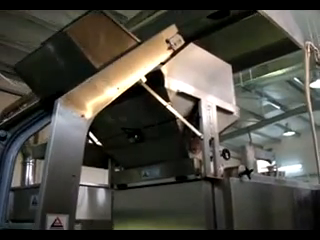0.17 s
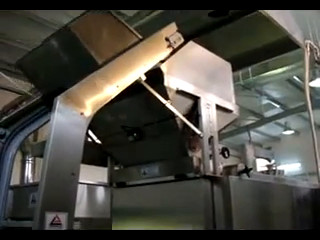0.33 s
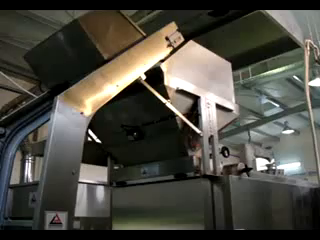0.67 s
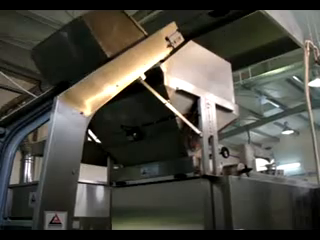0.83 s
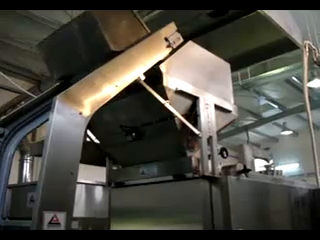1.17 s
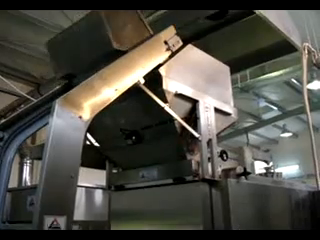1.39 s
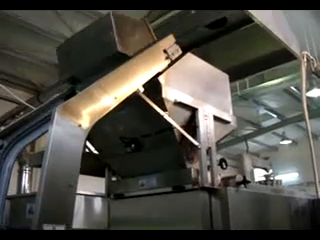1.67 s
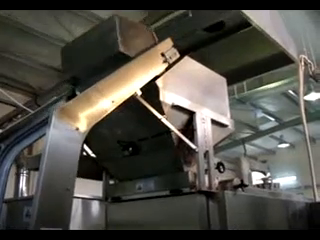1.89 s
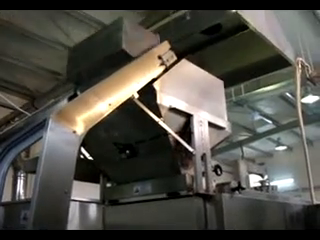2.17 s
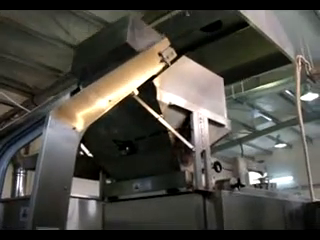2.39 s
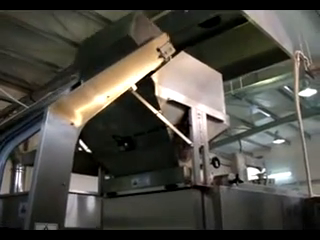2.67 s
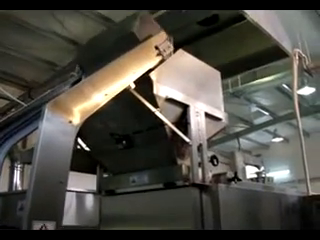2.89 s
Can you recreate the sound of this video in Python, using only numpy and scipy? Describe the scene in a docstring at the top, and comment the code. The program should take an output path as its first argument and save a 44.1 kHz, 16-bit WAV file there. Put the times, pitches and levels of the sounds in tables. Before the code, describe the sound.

Dense, loud machine noise from a bucket elevator fills a factory hall: steady grinding rattle over low rumble and motor hum, bright grainy hiss swelling early, a few dull clunks near start and end; single microphone, centred.

```python
"""A bucket elevator runs among other machines in a factory hall, heard by one microphone.
Its chain and buckets are patchy noise mixed with a dense rattle of tiny contacts that rings the steel casing.
Motors hum and gears whine as unsteady sine tones, over a drone, rumble and roar made of filtered noise.
A few hollow clunks are short bursts of resonant noise. A bright, grainy hiss swells early and ebbs near the end."""
import sys
import numpy as np
from scipy import signal
from scipy.fft import rfft, irfft, next_fast_len
from scipy.io import wavfile
from scipy.ndimage import uniform_filter1d, map_coordinates

SR = 44100
rng = np.random.default_rng(int(sys.argv[2]) if len(sys.argv) > 2 else 0)


def bounce(signal):
    """Save signal as a 16-bit WAV file at the path given by the first command-line argument."""
    frames = np.transpose(np.atleast_2d(signal))
    limited = np.clip(frames, -1, 1)
    pcm = np.round(limited * 32767).astype(np.int16)
    wavfile.write(sys.argv[1], SR, pcm)


N = 133623  # samples, about 3 seconds

# Pitch of the lower hum, which sags: (time [s], pitch [Hz])
LOW_HUM_PITCH = [(1.1, 250.3), (1.25, 242.3)]
# Loudness of the two motor hums: (time [s], level [dB])
HUM_LEVEL = [(0, -34), (0.15, -28.5), (0.27, -30), (0.35, -33.5), (0.55, -32), (0.86, -28), (1.0, -30),
             (1.45, -32), (1.66, -28.5), (1.87, -29.5), (1.96, -31.5), (2.05, -29.5), (2.26, -26),
             (2.38, -32), (2.65, -32.5), (2.8, -37), (3.03, -34)]
LOW_HUM_LEVEL = [(.6, -52), (1, -34.5), (1.25, -35), (1.45, -33.5), (1.68, -31), (1.95, -52)]
# Steady gear whines: (pitch [Hz], level [dB])
GEAR_WHINES = [(619, -42.5), (1049, -41.5), (1394, -42.5), (2550, -45), (2606, -40), (4226, -46),
               (8047, -54)]
# Loudness of each noise layer, before any fixed gain below is added: (time [s], level [dB])
DRONE_LEVEL = [(0, -60), (0.2, -51), (0.5, -65), (0.75, -61), (0.9, -62), (1.35, -58), (1.65, -56),
               (1.8, -50), (2.12, -48), (2.24, -61), (2.5, -58), (2.82, -69), (3.03, -60)]
RUMBLE_LEVEL = [(0, -36), (0.22, -33), (0.45, -38), (0.72, -33.5), (0.95, -39), (1.15, -34.5),
                (1.42, -38.5), (1.6, -33.5), (1.85, -32), (2.1, -34), (2.4, -36.5), (2.8, -37.5),
                (3.03, -37)]
ROAR_LEVEL = [(0, -24), (0.27, -23), (0.42, -26), (0.52, -27), (0.66, -23), (0.87, -23.5), (0.97, -25),
              (1.2, -25.5), (1.45, -25), (1.72, -23), (1.97, -24.5), (2.2, -24), (2.5, -25.5), (2.72, -24),
              (3.03, -23)]
UPPER_ROAR_LEVEL = [(0, -22), (0.17, -22), (0.33, -22.5), (0.42, -26), (0.5, -22.3), (0.65, -23.5),
                    (0.73, -26.5), (0.87, -21.5), (0.97, -26), (1.08, -23.5), (1.22, -23), (1.42, -24.6),
                    (1.7, -23.5), (1.85, -25.5), (2.05, -23.5), (2.25, -20.5), (2.42, -21), (2.68, -23),
                    (2.87, -20), (3.03, -24.5)]
DIN_LEVEL = [(0, -18), (0.15, -18), (0.45, -19.5), (0.75, -17.5), (0.93, -18.0), (1.02, -17.5),
             (1.3, -17.5), (1.48, -19.5), (1.7, -17.5), (1.95, -17.5), (2.15, -16.5), (2.45, -16.5),
             (2.8, -17), (3.03, -18.0)]
HISS_LEVEL = [(0, -28), (0.17, -25), (0.3, -22.5), (0.62, -22.5), (0.74, -21.5), (0.85, -22.5),
              (1.1, -23.5), (1.5, -23.5), (1.9, -23.5), (2.4, -24.5), (2.7, -24), (2.9, -27), (3.03, -25)]
# Tone colour of each noise layer, relative only: (frequency [Hz], level [dB])
DRONE_SPECTRUM = [(20, -10), (40, -6), (60, 2), (80, 0.5), (160, -20.5), (500, -61.5)]
RUMBLE_SPECTRUM = [(20, -57), (55, -42), (75, -22), (92, -9), (112, 0), (160, 0.3), (190, -2.5), (230, 0),
                   (300, -4), (500, -13), (1200, -55.5)]
ROAR_SPECTRUM = [(100, -41), (220, -10.5), (305, -2.5), (370, -4), (430, -1.5), (490, 0), (630, 0),
                 (740, -3), (900, -14.5), (2200, -45)]
UPPER_ROAR_SPECTRUM = [(400, -38), (620, -10.5), (760, 0), (850, 0.5), (1120, 0.1), (1400, -5), (2200, -16.5),
                       (6000, -56)]
DIN_SPECTRUM = [(400, -36.5), (1000, -6.5), (1450, -0.5), (1850, -0.5), (2100, 0.86), (3000, 0.5),
                (3750, -1), (4400, -4.5), (5300, -7.5), (7000, -19), (10000, -44.5)]
HISS_SPECTRUM = [(2000, -41), (4200, -7), (5400, -2.5), (6500, -0.5), (7300, -3), (8200, -7), (9000, -13),
                 (9600, -21), (10000, -35.5)]
# Broad resonances of the steel casing, relative levels: (frequency [Hz], width [Hz], level [dB])
CASING_RESONANCES = [(450, 27, -7.5), (610, 75, 9.5), (820, 44, -3), (866, 58, 6.5), (990, 26, -5),
                     (1052, 41, 4), (1200, 50, 1), (2300, 70, -15)]
# Hollow clunks, each timed at its loudest moment: (time [s], pitch [Hz], level [dB])
CLUNKS = [(0.191, 590, -22.5), (0.26, 606, -27), (0.74, 617, -24.5), (1.054, 626, -23.5), (2.51, 524, -25),
          (2.596, 694, -22.5)]

HUM_HZ = 277.4
TONE_KNOTS_PER_S, TONE_DRIFT_HZ = 3.47, 0.39  # speed and typical size of the pitch drift
# Fixed gains added to the levels above; the casing gain is relative to the din level
RUMBLE_DB, UPPER_ROAR_DB, DIN_DB, CASING_DB, HISS_DB = 1.3, 0.5, -0.02, -16, 1.2
DRONE_LUMPS_DB, DRONE_KNOTS_PER_S = 4.5, 15
RATTLES_PER_S, RATTLE_SPREAD_DB = 900, 3.5  # average number of contacts, and how unequal they are
RATTLE_DB = -4  # rattle against the patchy noise of the elevator
HALL_T60_S, HALL_DB = 1, -2  # time for the tail to fall 60 dB, and its level against the bare rattle
HISS_GRAIN_DB = -5.5  # rattle against the patchy noise of the hiss
HISS_FLUTTER_DB, HISS_KNOTS_PER_S = 0.37, 35
CLUNK_ATTACK_S, CLUNK_T60_S = 0.028, 0.27
CLUNK_WIDTH_HZ = 200  # width of one resonance; two in a row ring narrower
TOP_HZ = 9900


def amp(db):
    """Turn decibels into a plain gain."""
    return 10 ** (np.asarray(db) / 20)


def unit(x):
    """Scale a sound to an average (rms) strength of 1."""
    return x / np.sqrt(np.mean(x ** 2) + 1e-20)


def curve(rows):
    """Join (time, value) points with straight lines, one value per sample."""
    times, values = np.transpose(rows)
    return np.interp(np.arange(N) / SR, times, values)


def level(rows):
    """Turn (time, dB) points into one gain per sample."""
    return amp(curve(rows))


def wobble(knots_per_s):
    """Draw a smooth random curve through knots_per_s random points a second."""
    knots = rng.standard_normal(400)
    return map_coordinates(knots, [np.arange(N) * knots_per_s / SR + 2], mode="mirror")


def filtered(x, response):
    """Multiply each frequency in a sound by the response at that frequency."""
    size = next_fast_len(N + SR // 2)  # spare room keeps the end from wrapping to the start
    hz = np.fft.rfftfreq(size, 1 / SR)
    return irfft(rfft(x, size) * response(hz), size)[:N]


def coloured(x, spectrum):
    """Shape a sound by (frequency, dB) points on a log axis, then scale it to rms 1."""
    points_hz, db = np.transpose(spectrum)

    def response(hz):
        return amp(np.interp(np.log(hz + 1), np.log(points_hz + 1), db))

    return unit(filtered(x, response))


def resonance(hz, centre, width):
    """Response of one springy resonance: strongest at its centre, weaker to both sides."""
    return 1j * hz * width / (centre * centre - hz * hz + 1j * hz * width)


def rush(patchy_db):
    """Noise with patches of random loudness in time and frequency, at rms 1."""
    noise = signal.stft(rng.standard_normal(N), nperseg=512)[2]
    patches = uniform_filter1d(rng.standard_normal(noise.shape), size=6, axis=0)  # smooth over frequency
    patches = uniform_filter1d(patches, size=16, axis=1)  # smooth over time
    patchy_noise = noise * amp(patchy_db * unit(patches))
    return unit(signal.istft(patchy_noise, nperseg=512)[1][:N])


def tone(hz, wander_db):
    """A sine of rms 1, slightly unsteady in level and pitch."""
    pitch = hz + TONE_DRIFT_HZ * wobble(TONE_KNOTS_PER_S)
    phase = 2 * np.pi * (np.cumsum(pitch) / SR + rng.random())
    return unit(amp(wander_db * wobble(TONE_KNOTS_PER_S)) * np.sin(phase))


def drives():
    """One motor hums throughout, a lower hum swells and sags in pitch, and gears whine faintly."""
    hum = level(HUM_LEVEL) * tone(HUM_HZ, wander_db=-0.7)
    low_hum = level(LOW_HUM_LEVEL) * tone(curve(LOW_HUM_PITCH), wander_db=1.5)
    whines = sum(amp(db) * tone(hz, wander_db=-1.5) for hz, db in GEAR_WHINES)
    return hum + low_hum + whines


def hall():
    """The machines' lumpy low drone, rumble and roar, each made of filtered noise."""
    lumps = amp(DRONE_LUMPS_DB * wobble(DRONE_KNOTS_PER_S))
    low_noise = coloured(rng.standard_normal(N), DRONE_SPECTRUM)
    drone = level(DRONE_LEVEL) * unit(lumps * low_noise)
    rumble = amp(RUMBLE_DB) * level(RUMBLE_LEVEL) * coloured(rush(patchy_db=0.26), RUMBLE_SPECTRUM)
    roar = level(ROAR_LEVEL) * coloured(rush(patchy_db=0.5), ROAR_SPECTRUM)
    return drone + rumble + roar


def rattle():
    """Countless small steel contacts at random moments, each followed by the hall's fading tail."""
    count = N + SR  # one extra second first, so tails already sound at the start
    happens = rng.random(count) < RATTLES_PER_S / SR
    ticks = happens * np.sign(rng.standard_normal(count))
    ticks = ticks * amp(RATTLE_SPREAD_DB * rng.standard_normal(count))
    tail = rng.standard_normal(SR) * amp(-60 * np.arange(SR) / SR / HALL_T60_S)
    echoes = signal.fftconvolve(ticks, tail)[SR:count]
    return unit(unit(ticks[SR:]) + amp(HALL_DB) * unit(echoes))


def casing_response(hz):
    """The steel casing's resonances, added together."""
    return sum(amp(db) * resonance(hz, centre, width) for centre, width, db in CASING_RESONANCES)


def elevator():
    """The roar's upper band, while the chain and buckets scrape and rattle and the casing rings with them."""
    upper_roar = amp(UPPER_ROAR_DB) * level(UPPER_ROAR_LEVEL) * coloured(rush(patchy_db=0.7), UPPER_ROAR_SPECTRUM)
    contacts = unit(rush(patchy_db=0.6) + amp(RATTLE_DB) * rattle())
    din = amp(DIN_DB) * coloured(contacts, DIN_SPECTRUM)
    ring = amp(CASING_DB) * unit(filtered(contacts, casing_response))
    return upper_roar + level(DIN_LEVEL) * (din + ring)


def hiss():
    """A bright hiss, as of goods sliding over steel: noise and rattle with a slight flutter."""
    grains = unit(rush(patchy_db=1.53) + amp(HISS_GRAIN_DB) * rattle())
    flutter = amp(HISS_FLUTTER_DB * wobble(HISS_KNOTS_PER_S))
    return amp(HISS_DB) * level(HISS_LEVEL) * flutter * coloured(grains, HISS_SPECTRUM)


def clunks():
    """Short hollow surges of resonant noise, as of buckets jolting against the casing."""
    out = np.zeros(N)
    for peak_s, pitch, db in CLUNKS:
        t = np.arange(N) / SR - peak_s
        rise = np.clip(1 + t / CLUNK_ATTACK_S, 0, 1)
        fade = amp(-60 * np.maximum(t, 0) / CLUNK_T60_S)
        # squaring sends the noise through the same resonance twice
        hollow = filtered(rng.standard_normal(N), lambda hz: resonance(hz, pitch, CLUNK_WIDTH_HZ) ** 2)
        out += amp(db) * rise * fade * unit(hollow)
    return out


def scene():
    """Add all sources at one microphone; both channels are alike."""
    mono = drives() + hall() + elevator() + hiss() + clunks()
    return np.array([mono, mono])


def record(dry):
    """The recorder rounds off the highest peaks, then keeps nothing from TOP_HZ upward."""
    rounded = dry / (1 + np.abs(dry / 0.9) ** 8) ** (1 / 8)
    return np.array([filtered(channel, lambda hz: hz < TOP_HZ) for channel in rounded])


dry = scene()
out = record(dry)
bounce(out)
```